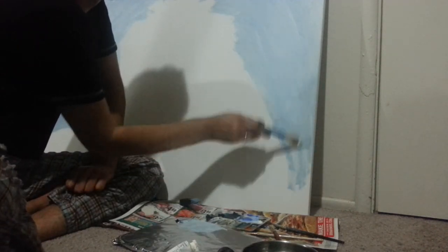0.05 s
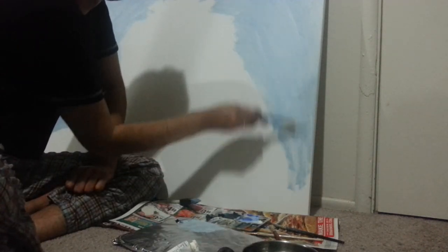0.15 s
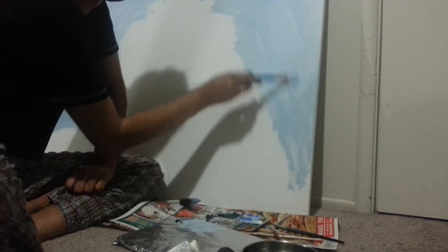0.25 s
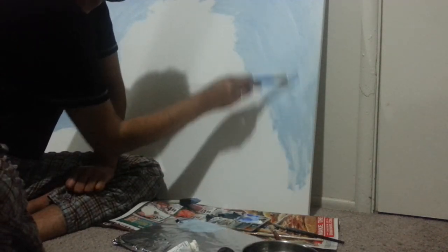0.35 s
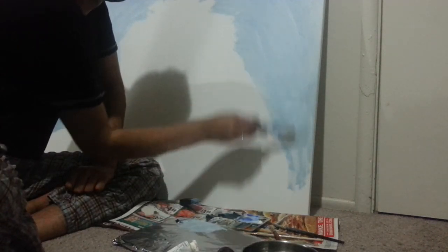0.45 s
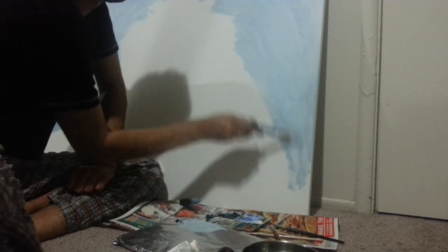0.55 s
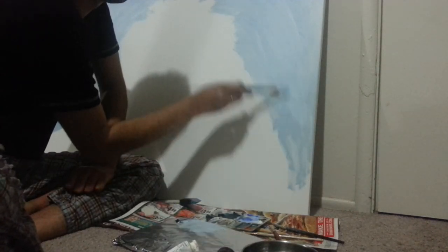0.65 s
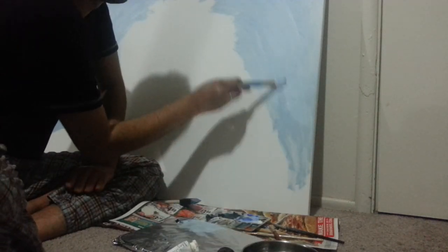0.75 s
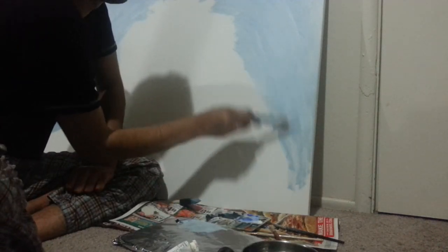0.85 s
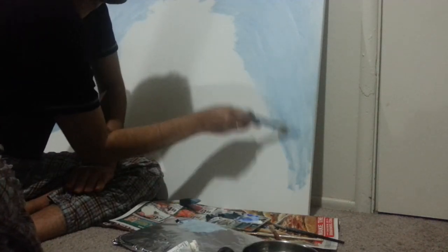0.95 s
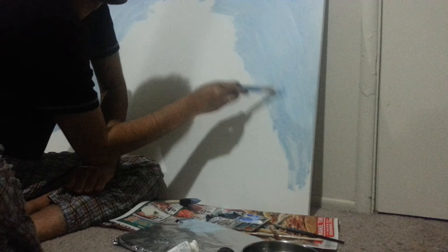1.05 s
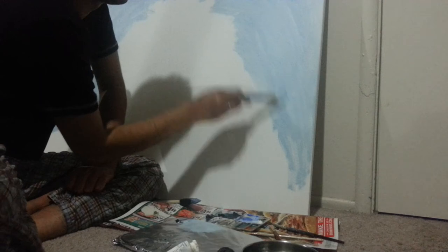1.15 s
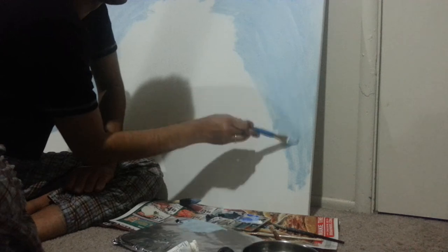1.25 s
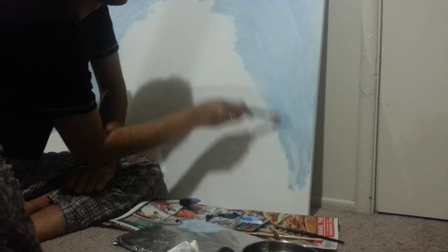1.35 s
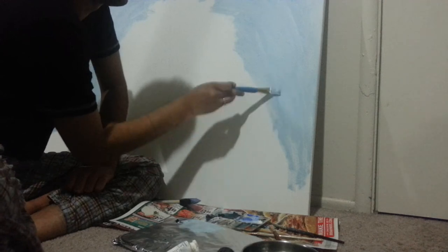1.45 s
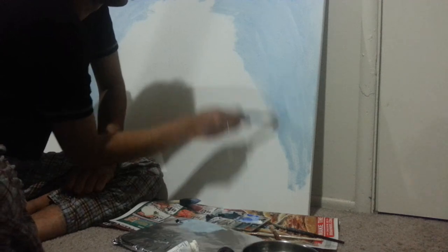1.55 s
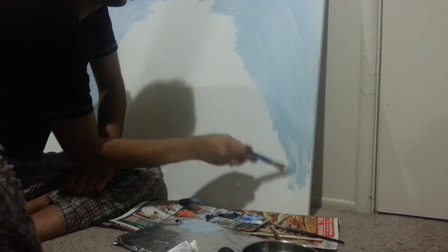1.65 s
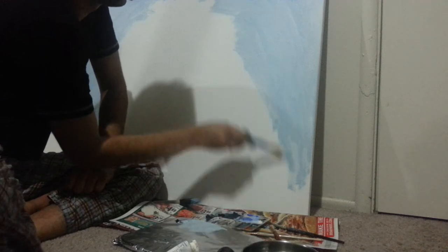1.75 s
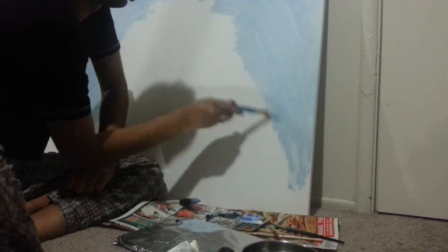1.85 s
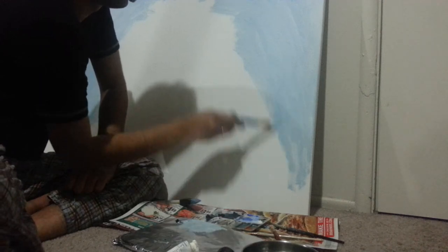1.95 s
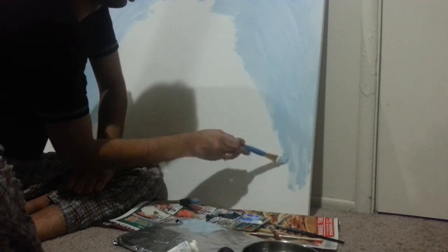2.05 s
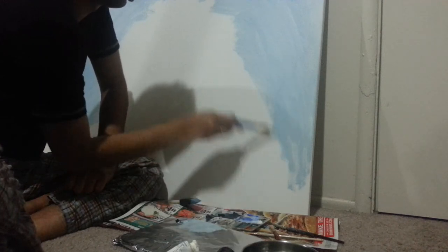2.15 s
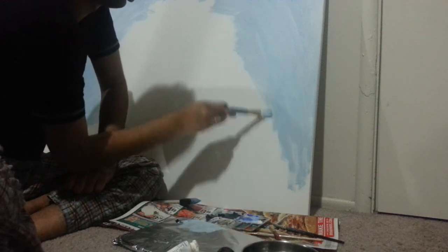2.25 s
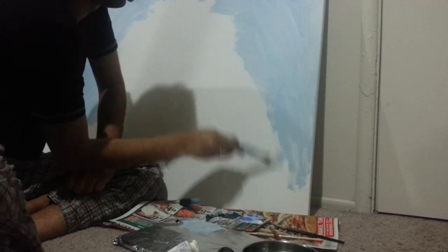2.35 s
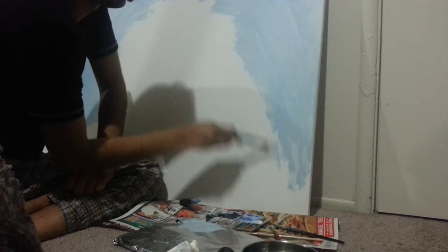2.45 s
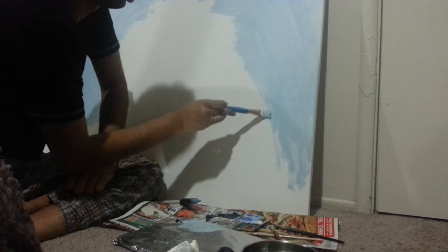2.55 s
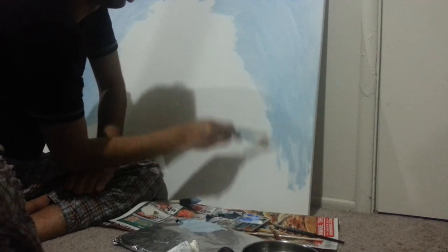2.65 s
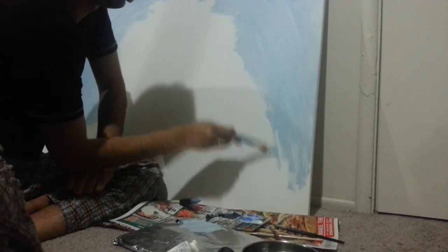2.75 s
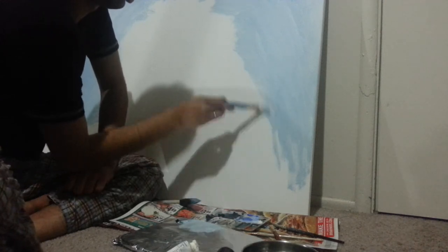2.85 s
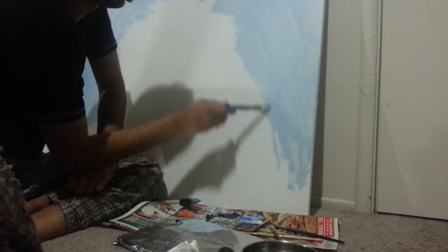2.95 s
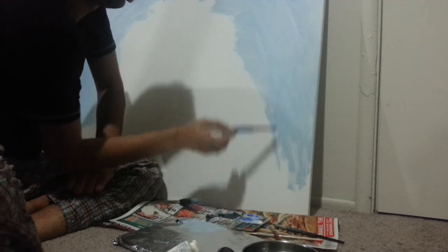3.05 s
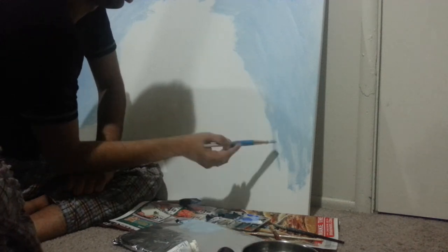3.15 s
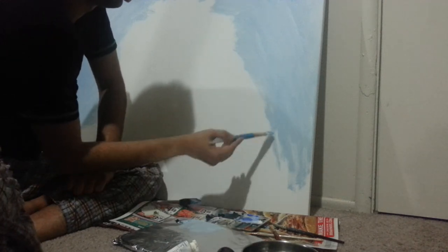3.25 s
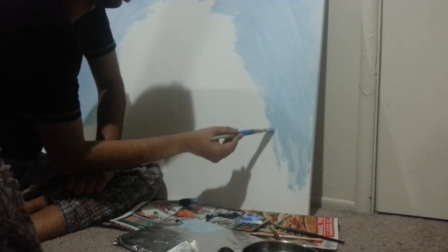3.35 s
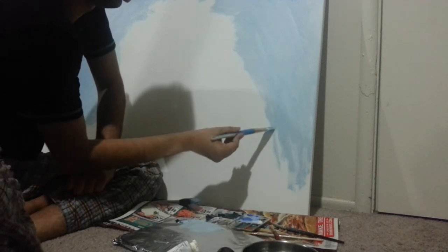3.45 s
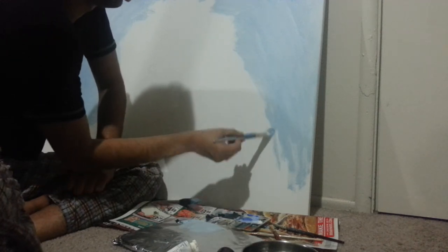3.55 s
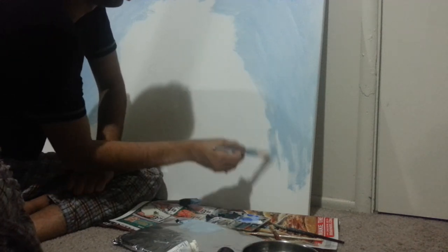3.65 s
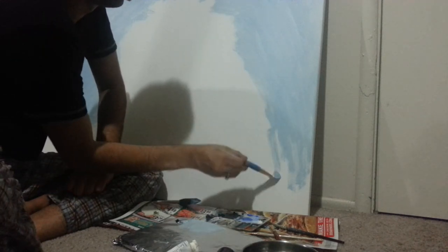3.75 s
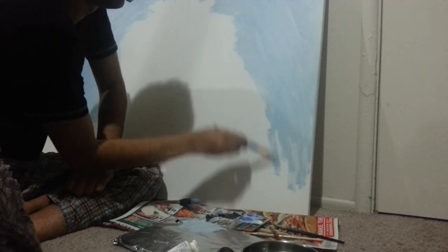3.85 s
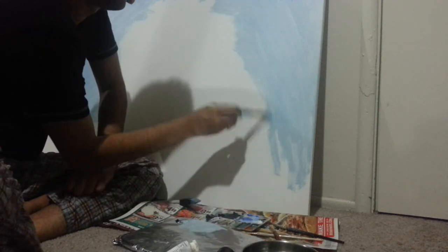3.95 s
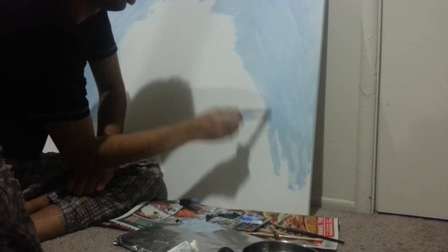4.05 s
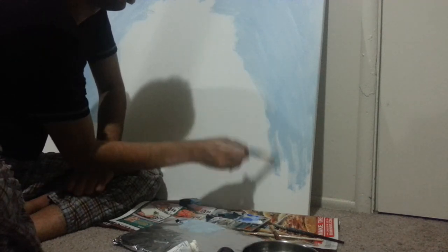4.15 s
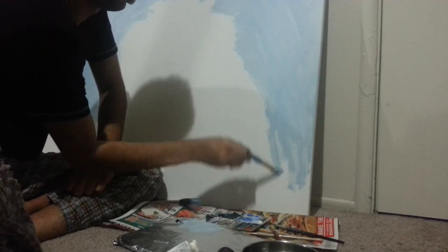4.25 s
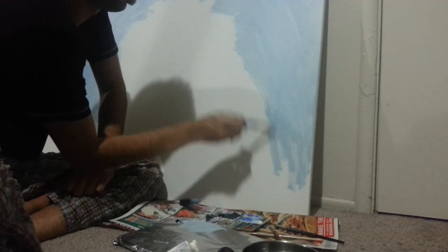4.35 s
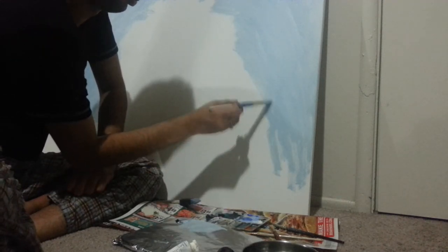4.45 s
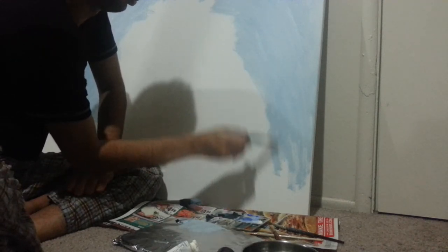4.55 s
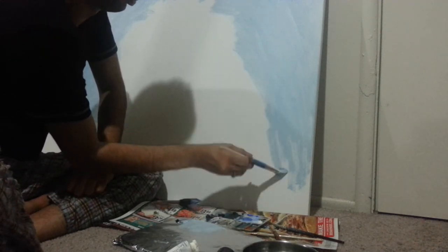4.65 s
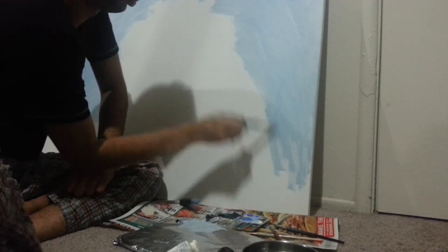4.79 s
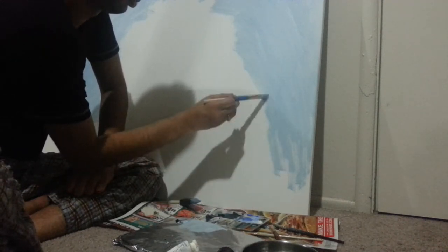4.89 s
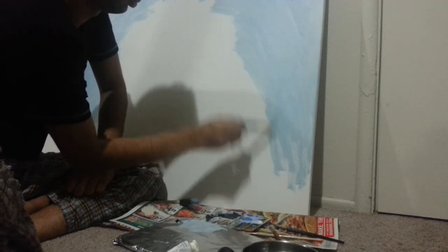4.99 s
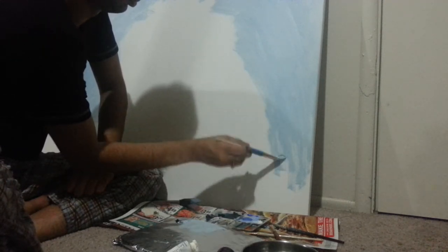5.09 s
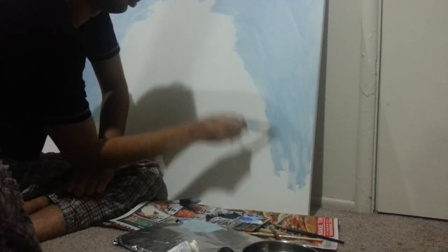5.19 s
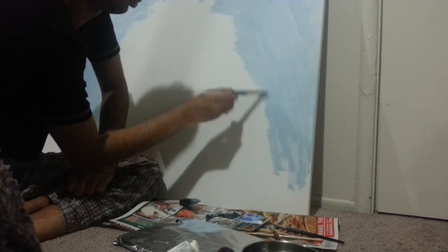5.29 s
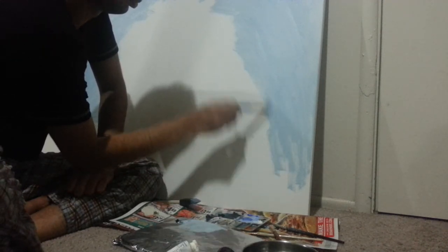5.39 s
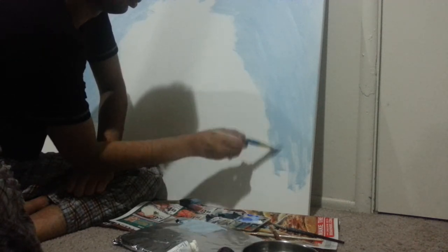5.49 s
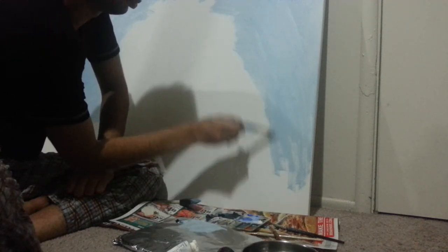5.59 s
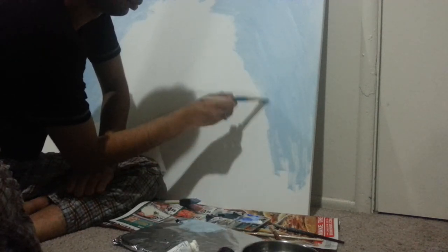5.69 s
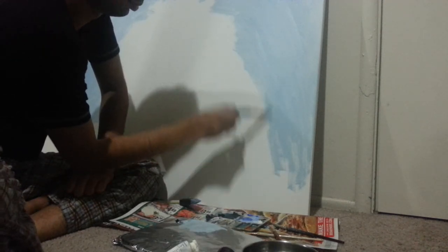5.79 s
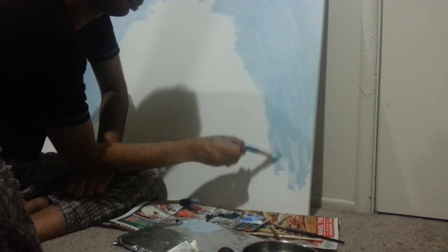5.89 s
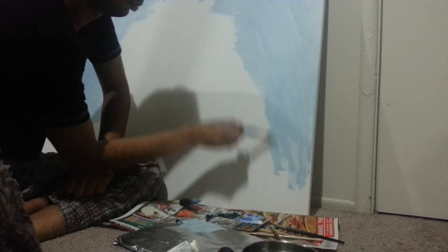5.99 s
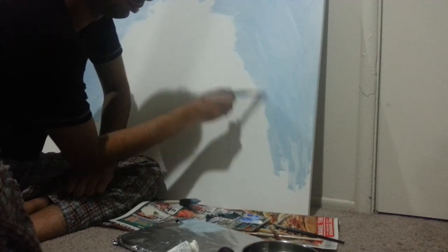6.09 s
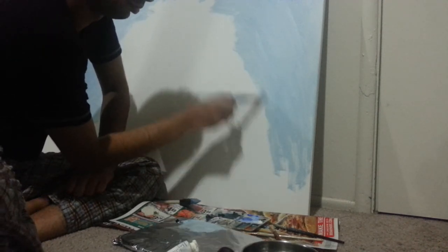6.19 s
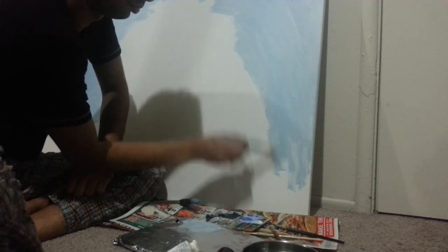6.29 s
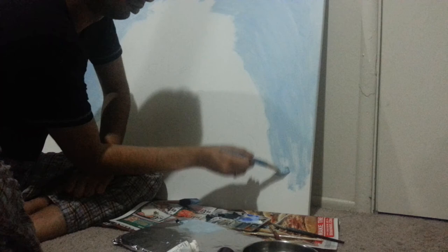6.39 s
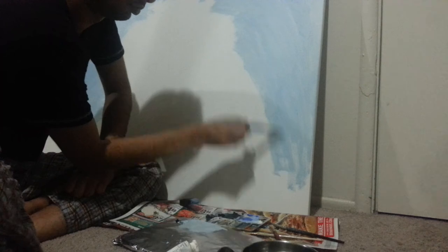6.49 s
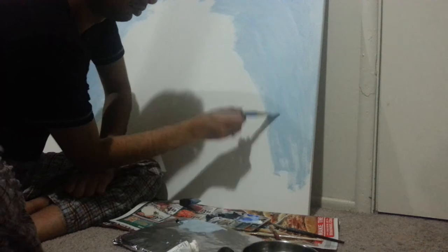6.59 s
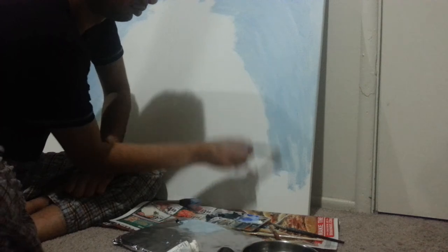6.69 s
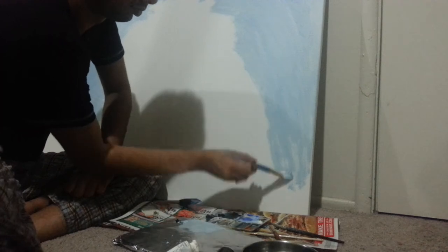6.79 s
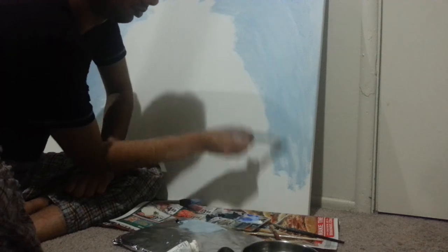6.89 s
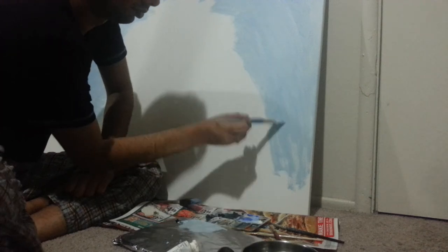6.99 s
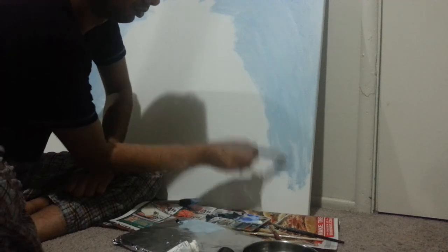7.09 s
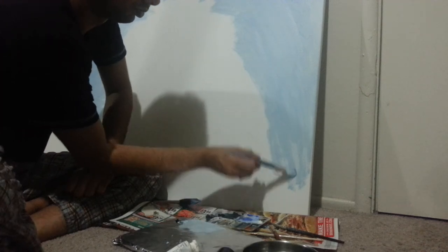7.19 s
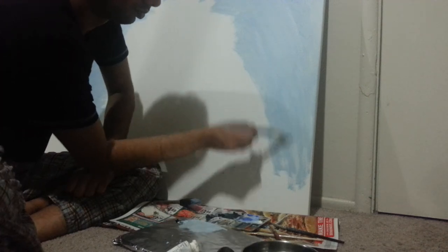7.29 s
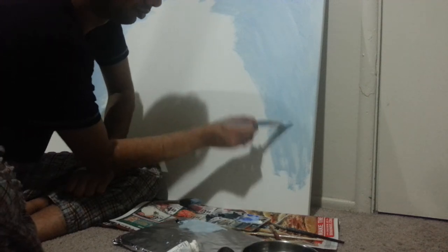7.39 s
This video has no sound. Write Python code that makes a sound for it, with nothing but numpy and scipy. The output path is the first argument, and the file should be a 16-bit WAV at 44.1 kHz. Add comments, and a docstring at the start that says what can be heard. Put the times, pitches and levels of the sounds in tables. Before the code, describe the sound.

A flat paintbrush scrubs back and forth on a stretched canvas from the start, about five strokes a second. Each stroke is a short, bright hiss of bristles with a light rumble of cloth underneath, and some hold faint, brief gliding tones. At about 3 seconds the scrubbing pauses, leaving very light touches and two tiny, high ticks. Around 3.6 seconds the strokes resume, somewhat softer. From about 4.2 to 5.5 seconds the brush bumps and pushes the canvas, giving soft, low, drum-like thuds, strongest near 4.4 seconds. The scrubbing continues unevenly, with a stronger stroke near 6.2 seconds, another thud at 6.5 and two small ticks around 7, and runs on until about 7.5 seconds. Everything is heard from a short way off in a quiet carpeted room, with a very short echo and a faint steady hush.

```python
"""A flat paintbrush scrubs to and fro on a stretched canvas in a quiet carpeted room.
Its bristles slip over the weave in a dense hiss, with a few ticks and brief gliding tones within it.
The cloth rumbles under the brush, thuds when bumped and drums when pushed.
Two microphone ports (openings), each with its own resonance, hear it from a short way off,
along with a short room echo and a steady hush."""
import sys
import numpy as np
from scipy import signal
from scipy.io import wavfile
from scipy.ndimage import uniform_filter1d

SR = 44100
rng = np.random.default_rng(int(sys.argv[2]) if len(sys.argv) > 2 else 0)


def to_wav(sig):
    """Store sig (one row per channel, or 1-D mono) as 16-bit WAV at the path in sys.argv[1].

    Samples outside -1..1 are clipped; the rate is SR.
    """
    pcm = np.clip(np.atleast_2d(sig), -1, 1) * 32767
    pcm = np.round(pcm).astype(np.int16)
    wavfile.write(sys.argv[1], SR, pcm.T)  # frames by channels


N = 327663

# One row per stroke or light touch: start t/s, rise/s, hold/s, hiss level/dB, change over the hold/dB,
# fade/(dB per s), rumble over hiss/dB, rumble change from mid-stroke to end/dB, time pressed/s,
# extra low rasp/dB, extra high fizz/dB, rumble centre f/Hz, drumhead level/dB
STROKES = [(-0.061, 0.056, 0.07, -32, -1.9, 164, -17.5, 2.5, 0.152, 0.5, 0.7, 710, -61),
           (0.127, 0.064, 0.11, -31.8, -10, 190.0, -16, 2, 0.17, -0.5, 1.0, 560.0, -61),
           (0.354, 0.043, 0.093, -37.5, 3.5, 184, -11.5, -1.5, 0.15, 2.5, -0.5, 660, -64),
           (0.562, 0.026, 0.084, -34.5, -0.9, 164, -17.5, -0.5, 0.167, -0.5, 1, 580.0, -65.4),
           (0.757, 0.08, 0.059, -38.5, 2, 192, -11, 3, 0.147, 3, -0.2, 674, -63),
           (0.966, 0.035, 0.072, -33, -2.5, 192, -17.5, 3.5, 0.13, -0.4, -0.4, 680.0, -62),
           (1.136, 0.059, 0.059, -38.5, 0, 220.0, -10, -0.7, 0.137, 2.4, -1.5, 604, -67),
           (1.324, 0.038, 0.087, -36, -7.5, 204, -14.5, -1.5, 0.16, 0.3, -0.4, 680.0, -60),
           (1.511, 0.032, 0.11, -46, 4.5, 198, -8.5, 3.3, 0.13, 3.5, -1.5, 627, -66),
           (1.748, 0.032, 0.11, -36, -5, 210.0, -15.5, -1, 0.12, -1.6, 1.5, 600.0, -63.5),
           (1.932, 0.049, 0.084, -45, 1.5, 250.0, -6.5, 4.5, 0.085, 1.4, -1, 680, -67.3),
           (2.115, 0.044, 0.083, -33.5, -5, 280.0, -14.5, 0.5, 0.12, -2.5, -0.1, 680.0, -61),
           (2.265, 0.087, 0.046, -30.5, -3, 222, -14, -4, 0.23, -1.5, 1.5, 626, -59),
           (2.438, 0.04, 0.053, -33.5, 2.5, 217, -17, -0.5, 0.18, -1, 0.2, 620.0, -65),
           (2.607, 0.048, 0.045, -35.5, 4.5, 207, -10.5, 3.1, 0.061, -1.5, 2.5, 730.0, -61.5),
           (2.754, 0.072, 0.045, -31.5, -7, 184, -13.5, -3, 0.289, -0.9, -0.2, 550.0, -60.5),
           (3.064, 0.0099, 0.016, -61.5, -2, 320.0, -22, 9, 0.1, -0.5, 4.0, 490.0, -76.2),
           (3.149, 0.011, 0.018, -62.5, -2.5, 390.0, -17, 5, 0.009, 1, 7.5, 510.0, -67),
           (3.329, 0.0085, 0.012, -73.8, -8, 102, -11, 4, 0.017, 2, 4.0, 510.0, -78),
           (3.564, 0.018, 0.06, -61, 7.5, 200.0, -6.4, 2, 0.027, -2.5, -1, 430.0, -76.0),
           (3.592, 0.091, 0.09, -40, -11.5, 310.0, -13, -1.5, 0.234, -1.6, -0.2, 600, -70),
           (3.825, 0.045, 0.11, -41.5, 2.1, 257, -9, 5, 0.11, -1.0, 0, 410.0, -62.5),
           (4.076, 0.076, 0.06, -42, -6.5, 240.0, -7, 0.5, 0.194, 1, -0.5, 470.0, -55.5),
           (4.287, 0.057, 0.047, -40.5, 0.3, 220.0, -5.5, 1, 0.18, 0.0, -0.5, 337, -45.5),
           (4.487, 0.087, 0.091, -43.5, -6.4, 240.0, 0.5, 4, 0.11, 3, 0, 350.0, -51.5),
           (4.713, 0.062, 0.062, -41, -4.5, 230.0, -14.5, -1, 0.27, 0.2, -0.3, 460.0, -62.5),
           (4.926, 0.096, 0.061, -39, -4, 250.0, -6.5, 0, 0.13, 1.3, -2, 453, -58),
           (5.139, 0.06, 0.072, -41.1, 1.8, 183, -11.5, 3.5, 0.11, -0.5, -0.5, 297, -63.5),
           (5.358, 0.082, 0.063, -40, 1.1, 250.0, -9.5, 7.5, 0.1, 1.4, -0.0, 450.0, -66),
           (5.574, 0.024, 0.063, -47, 2, 218, -15.5, 2.0, 0.253, 0.8, -0.5, 730.0, -69.5),
           (5.764, 0.053, 0.075, -42, 6.5, 235, -13, 4.6, 0.14, -1, 0.5, 605, -65),
           (5.964, 0.052, 0.074, -43.4, -6.8, 320.0, -11.5, 2, 0.069, 1.5, -2, 670.0, -68),
           (6.177, 0.085, 0.098, -33, -6, 230.0, -11.5, 2.3, 0.19, 0.2, 1.5, 575, -58),
           (6.418, 0.047, 0.09, -44.5, -14.5, 240.0, -4.5, 11, 0.076, 1.3, -1, 320.0, -50),
           (6.62, 0.05, 0.083, -36.4, 1.2, 212, -9.5, 0.1, 0.15, 0.3, 1.5, 646, -58),
           (6.837, 0.035, 0.051, -45, -5.5, 390.0, -17.5, 2.5, 0.287, -1.3, -2, 560.0, -72.1),
           (6.988, 0.01, 0.022, -62, -1.7, 230.0, -20.0, 7.5, 0.031, 2, 4, 440.0, -70),
           (7.024, 0.058, 0.072, -38, -2, 262, -11.5, 6, 0.11, -0.3, 0, 700, -59),
           (7.228, 0.038, 0.064, -44.5, -1, 260.0, -14, 1, 0.154, 1.9, -1.5, 490.0, -71),
           (7.411, 0.016, 0.019, -54, -6.2, 450.0, -14.5, -9, 0.153, 1, -1, 460.0, -72.5)]
# How the ports colour the hiss: f/Hz, left/dB, right/dB, left-right likeness (0 to 1), left lead/rad
PORT_COLOUR = [(120, -46, -50, 0.73, -0.5), (500, -20.5, -39, 0.24, -0.06), (1110, -16.5, -15.5, 0.81, 1.3),
               (1350, -16, -20, 0.17, 2.5), (1600, -13.5, -17.5, 0.91, 1.1), (3000, -11, -13.5, 0.97, 1.06),
               (3230, -8.5, -12.5, 0.16, 2.5), (4040, -9, -14.5, 0.33, 1.2), (5400, -4.5, -8, 0.48, 0.22),
               (6450, -10, -5.5, 0.36, 1.16), (7200, -17.5, 0.5, 0.16, 1.5), (7700, -15, -5, 0.086, 5),
               (9940, -20, -14, 0.103, 0), (10750, -18.5, -13, 0.069, 3.1), (13900, -26, -21.5, .1, 1.5),
               (15100, -47, -33.5, 0.077, 1.5)]
# The bristles catch all at once: t/s, size of the level step/dB
CATCHES = [(.392, 1), (.587, 2), (.995, 2), (1.354, 3), (1.54, 3), (1.773, 5), (2.148, 2), (2.97, 3),
           (3.585, 7), (3.625, 5), (3.845, 4), (4.118, 16), (4.321, 2), (4.755, 4), (4.984, 2), (5.595, -1),
           (5.802, 4), (6.211, 7), (6.635, 6), (6.9965, 5), (7.048, 7), (7.259, 3)]
# Brief gliding tones heard within the scrubbing: t/s, length/s, first f/Hz, last f/Hz, level/dB
GLIDES = [(0.051, 0.054, 837, 390, -50), (0.185, 0.066, 490, 570, -51), (0.257, 0.027, 370, 295, -49),
          (0.376, 0.034, 305, 362, -47.5), (.41, 0.06, 525, 557, -45), (0.497, 0.048, 560, 378, -49),
          (0.829, 0.017, 806, 876, -44.5), (0.852, 0.043, 286, 325, -48), (0.885, 0.03, 898, 640, -44.5),
          (1.225, 0.072, 281, 423, -52), (1.35, 0.081, 787, 850, -52.5), (1.991, 0.093, 820, 754, -50.5),
          (2.306, 0.043, 723, 867, -46), (2.362, 0.072, 1122, 264, -45), (2.458, 0.043, 415, 424, -47.5),
          (2.546, 0.025, 900, 624, -46.5), (2.651, 0.038, 703, 888, -41), (5.2, 0.064, 301, 284, -42.5),
          (5.386, 0.042, 475, 865, -58), (5.85, 0.1, 434, 404, -53), (5.851, 0.057, 950, 840, -48.5),
          (6.235, 0.043, 1064, 1215, -49.5), (6.74, 0.025, 870, 650, -42), (7.08, 0.062, 895, 778, -49.5),
          (7.282, .07, 456, 292, -57)]
# Sharp ticks: t/s, level/dB, left over right/dB
TICKS = [(3.076, -38, -16), (3.1585, -40, -19), (6.9162, -42, -9), (6.998, -38, -15)]
# The tones in one tick: f/Hz, level/dB, time to fade by 60 dB/s
TICK_TONES = [(7530, -6.5, 0.0044), (8650, -2, 0.0022), (11100, -8, 0.0037), (13000, -20, .002)]
# Resonances (favourite pitches) of the cloth on its frame: f/Hz, width/Hz, level/dB
CLOTH_RESONANCES = [(222, 35, 1), (297.5, 46.4, 1.5), (344.5, 27.4, 1.5), (417, 49, -2), (520, 64, -1.5),
                    (610, 95, -2.5), (712, 64, 0), (844, 104, 0), (946, 130, -2.5), (1008, 67, -4.5)]
# Looser swings of the whole cloth: f/Hz, width/Hz, level/dB
DRUM_RESONANCES = [(102, 57, -8), (181, 44, -9.5), (61, 47, -32.5)]
# Firm pushes on the cloth: t/s of the widest swing, level/dB, swell time/s
PUSHES = [(3.9, -55.5, 0.059), (4.235, -53, 0.074), (4.42, -40.5, 0.062), (4.615, -41.5, 0.065),
          (4.81, -64.5, 0.034), (5.0, -63, .03), (5.475, -60.5, 0.023), (6.52, -46, .065)]
# The brush bumps the cloth: t/s, strength/dB, f/Hz
BUMPS = [(3.875, -49, 260), (4.191, -42, 300), (4.355, -29, 345), (4.559, -35, 333), (4.982, -39, 344),
         (5.454, -38, 295), (6.464, -34, 320)]
# Colour of the background hush: f/Hz, left/dB, right/dB, left-right likeness (0 to 1)
HUSH_COLOUR = [(30, 10, 13, .5), (66, -10, -20, .5), (130, 7, 6.5, 0.22), (260, 0, -7, 0.19),
               (500, -3.5, -9, 0.21), (1200, -10, -17.5, .05), (3520, -14, -16, 0.031),
               (5500, -13, -16, .05), (7700, -16, -9, .05), (9500, -11, -14.5, .02),
               (10700, -18, -0.5, .02), (12500, -19, -19, .02), (14700, -8, -14, .02)]

RISE_POWER = 2.03  # a stroke swells as this power of the time since the brush set off
RASP_DIP, RASP_DIP_MOST_DB = 0.24, 1.5  # the low rasp thins as the brush slows, down to a limit
LEAD_DB, LEAD_S = 19.5, 0.023  # the cloth rumbles before the hiss has built up
STOP_DB_PER_S = 143  # the rumble falls away under the hiss once the pressure is off
DRUM_SHARE, DRUM_LAG_S = 0.86, 0.014  # the drumhead follows the stroke, shallower and late
DRUM_HZ, SETTLE_S = 135.6, 0.032  # its clear note settles fast after a push
LINGER_DB, LINGER_FADE_S = -26, 0.79  # a faint ring stays on, losing 60 dB in this time
HUSH_DB, TREBLE_LIMIT_HZ = -69.5, 14620


def bristle_hiss():
    """Bristles slip over the weave, coloured by the ports; tufts catch and free in drifting patches."""
    slicing = dict(fs=SR, nperseg=256, noverlap=192)
    hz, t, spectrum = signal.stft(slips(per_s=10000, spread_db=2.0), **slicing)
    left_db, right_db, likeness, lead = at_pitches(PORT_COLOUR, hz)
    patches = uniform_filter1d(rng.standard_normal((len(t), len(hz))).T, size=4, axis=0)
    patches = unit_level(uniform_filter1d(patches, size=20, axis=1))
    judder = wobble(len(t), smooth=9)  # the whole brush stutters
    colour_db = np.array([left_db, right_db]) + 1.58 * patches + 0.083 * judder
    spectrum = stereo(spectrum, likeness) * gain_of(colour_db)
    spectrum[0] *= np.exp(1j * lead)
    spectrum /= np.sqrt(np.mean(signal.istft(spectrum, **slicing)[1].mean(0) ** 2))
    hiss_db, _, _, rasp_db, fizz_db, _ = stroke_curves(t)
    light_touch_db = -0.23 * (np.maximum(hiss_db, -80) + 39.0)  # a light touch is brighter at the top
    highs = np.clip((hz[:, None] - 8000) / 2500, 0, 1)
    lows = np.clip((4300 - hz[:, None]) / 900, 0, 1)
    spectrum *= gain_of(highs * (fizz_db + light_touch_db) + lows * rasp_db)
    hiss = signal.istft(spectrum, **slicing)[1][:, :N]
    sample_t = np.arange(N) / SR
    return hiss * gain_of(stroke_curves(sample_t)[0] + catch_db(sample_t))


def slips(per_s, spread_db):
    """Rubbing is many tiny slips: two dense streams of clicks of random size and sign."""
    size = gain_of(spread_db * np.minimum(rng.exponential(1, (2, N)), 4))
    sign = rng.choice([-1., 1.], (2, N))
    return unit_level(size * sign * (rng.random((2, N)) < per_s / SR))


def stroke_curves(t):
    """Strokes rise, hold and fade: gives hiss, rumble, drumhead, rasp, fizz (dB), rumble centre (Hz)."""
    (start, rise, hold, hiss_db, change_db, fade, rumble_db, along_db, pressed,
     rasp_db, fizz_db, centre_hz, drum_db) = np.transpose(STROKES)[:, :, None]
    step = 1 / 1000
    grid = np.arange(0, N / SR + step, step)
    since = grid - start
    rise_db = 20 * RISE_POWER * np.log10(np.clip(since / rise, 1e-4, 1))
    slowed_db = fade * np.maximum(since - rise - hold, 0)
    shape_db = rise_db + change_db * np.clip((since - rise) / hold, 0, 1) - slowed_db
    lead_db = LEAD_DB * np.exp(-abs(since) / LEAD_S)
    travel_db = along_db * (2 * np.clip(since / (rise + hold), 0, 1) - 1)
    stop_db = STOP_DB_PER_S * np.maximum(since - pressed, 0)
    # Squared gains are powers, which add up where strokes overlap.
    hiss = gain_of(hiss_db + shape_db) ** 2
    rumble = hiss * gain_of(rumble_db + lead_db + travel_db - stop_db) ** 2
    drum = gain_of(drum_db + DRUM_SHARE * shape_db) ** 2 * (since > 0)
    lag = np.exp(-step / DRUM_LAG_S)
    late_drum = signal.lfilter([1 - lag], [1, -lag], drum.sum(0))
    levels = [10 * np.log10(power + 1e-12) for power in (hiss.sum(0), rumble.sum(0), late_drum)]
    rasp_db = rasp_db - np.minimum(RASP_DIP * slowed_db, RASP_DIP_MOST_DB)
    share = hiss / (hiss.sum(0) + 1e-30)  # the loudest stroke has most say in the colour
    colours = [(share * column).sum(0) for column in (rasp_db, fizz_db, centre_hz)]
    return [np.interp(t, grid, curve) for curve in levels + colours]


def catch_db(t):
    """At each catch the bristles bend and hold back, then let go with a little overshoot."""
    when, step_db = np.transpose(CATCHES)[:, :, None]
    hold_back = -0.7 * np.exp(-abs(t - when) / 0.015)
    let_go = 0.23 * np.exp(-abs(t - when) / 0.0035)
    return (step_db * np.where(t < when, hold_back, let_go)).sum(0)


def gliding_tones():
    """Brief gliding tones heard within the scrubbing; each swells and fades, its pitch a little rough."""
    out = np.zeros(N)
    uneven = wobble(N, smooth=300)
    for start, length, from_hz, to_hz, db in GLIDES:
        at, n = round(start * SR), round(length * SR)
        hz = np.linspace(from_hz, to_hz, n) * (1 + 0.02 * uneven[at:at + n])
        swell = gain_of(db) * signal.windows.tukey(n, 0.7)
        out[at:at + n] += swell * np.sin(2 * np.pi * np.cumsum(hz) / SR)
    return out


def bristle_ticks():
    """A bristle or wet paint lets go with a click that rings high for a moment."""
    out, t = np.zeros((2, N)), np.arange(200) / SR
    click = sum(gain_of(db - 60 * t / fade) * np.sin(2 * np.pi * hz * t) for hz, db, fade in TICK_TONES)
    click = cut_below(click, hz=5800, order=3)
    for start, db, pan_db in TICKS:
        sides_db = np.array([[pan_db], [-pan_db]]) / 2
        out[:, round(start * SR):][:, :len(t)] += gain_of(db + sides_db) * click
    return out


def cloth_rumble():
    """Rubbing shakes the cloth's low resonances, different ones as the brush travels."""
    _, rumble_db, _, _, _, centre_hz = stroke_curves(np.arange(N) / SR)
    rub = stereo(slips(per_s=5000, spread_db=2.5), likeness=0.84)
    rumble = ring(rub * gain_of(rumble_db), CLOTH_RESONANCES, np.maximum(centre_hz, 100))
    return cut_below(rumble / np.std(ring(rub, CLOTH_RESONANCES)), hz=120)


def cloth_drum():
    """The whole cloth swings like a drumhead: loosely with each stroke, on a clear note when pushed."""
    t = np.arange(N) / SR
    drum_db = stroke_curves(t)[2]
    note = np.sin(2 * np.pi * np.cumsum(DRUM_HZ + 3 * wobble(N, smooth=1500)) / SR)
    note *= gain_of(3.5 * wobble(N, smooth=900))  # the brush on the cloth unsettles it
    shaking = stereo(rng.standard_normal((2, N)), likeness=0.73)
    loose = unit_level(ring(shaking, DRUM_RESONANCES))
    drum = np.sqrt(2) * note * push_swing(t) + loose * gain_of(drum_db)
    return drum * gain_of([[-0.7], [0.7]])  # a little louder on the right


def push_swing(t):
    """How strong the clear note is: each push swells, settles and leaves a faint ring."""
    when, level_db, swell = np.transpose(PUSHES)[:, :, None]
    since = t - when
    before = np.cos(np.pi / 2 * np.clip(since / swell, -1, 0)) * (1 + gain_of(LINGER_DB))
    settle = np.exp(-(since / SETTLE_S) ** 2 / 2)
    linger = gain_of(LINGER_DB - 60 * abs(since) / LINGER_FADE_S)
    return (gain_of(level_db) * np.where(since < 0, before, settle + linger)).sum(0)


def cloth_bumps():
    """A soft blow of a few cycles sets the cloth's resonances near its pitch ringing."""
    blows, t = np.zeros(N), np.arange(1500) / SR
    swell = t / 0.0031 * np.exp(1 - t / 0.0033)
    for start, db, hz in BUMPS:
        blows[round(start * SR):][:len(t)] += gain_of(db) * swell * np.sin(2 * np.pi * hz * t)
    return ring(blows, CLOTH_RESONANCES)


def ring(x, resonances, centre_hz=None):
    """Shakes resonances of alternating sign with x; those near centre_hz are shaken hardest."""
    out = 0
    for k, (hz, width, db) in enumerate(resonances):
        decay = np.exp(-np.pi * width / SR)
        drop_db = 0 if centre_hz is None else np.minimum(3.66 * np.log2(hz / centre_hz) ** 2, 9)
        feedback = decay * np.exp(2j * np.pi * hz / SR)
        ringing = signal.lfilter([1 - decay], [1, -feedback], x * gain_of(-drop_db)).real
        out = out + (-1) ** k * gain_of(db) * 2 * ringing
    return out


def room_echo(x):
    """Scattered reflections die fast in the carpeted room; each port gets its own."""
    t = np.arange(9000) / SR
    echoes = rng.choice([-1., 1.], (2, len(t))) * (rng.random((2, len(t))) < 0.06)
    echoes *= (t > 0.004) * gain_of(-60 * t / 0.13)
    lows = signal.butter(2, 900, fs=SR, output="sos")
    echoes[1] += signal.sosfilt(lows, 0.45 * (echoes[0] - echoes[1]))  # long waves arrive more alike
    echoes /= np.linalg.norm(echoes, axis=1, keepdims=True)
    return signal.fftconvolve(x, echoes, axes=1)[:, :N]


def hush():
    """The steady, faint noise of the room and the microphones."""
    hz, _, spectrum = signal.stft(rng.standard_normal((2, N)), SR, nperseg=2048)
    left_db, right_db, likeness = at_pitches(HUSH_COLOUR, hz)
    spectrum = stereo(spectrum, likeness) * gain_of([left_db, right_db])
    noise = signal.istft(spectrum, SR, nperseg=2048)[1][:, :N]
    return gain_of(HUSH_DB) * noise / np.std(noise.mean(0))


def gain_of(db):
    """Turns decibels into a number to multiply by."""
    return 10 ** (np.asarray(db) / 20)


def unit_level(x):
    """Scales x to an average (rms) level of 1."""
    return x / np.sqrt(np.mean(x ** 2) + 1e-20)


def wobble(n, smooth):
    """A random wander of n points; a larger smooth makes it slower."""
    return unit_level(uniform_filter1d(rng.standard_normal(n), size=smooth))


def at_pitches(table, hz):
    """Looks up a table at the frequencies hz, blending between its rows."""
    row_hz, *columns = np.transpose(table)
    return [np.interp(np.log(hz + 1), np.log(row_hz + 1), column)[:, None] for column in columns]


def stereo(x, likeness):
    """Mixes two unrelated signals into a left and right of given likeness."""
    likeness = np.clip(likeness, 0, 1)
    return np.array([x[0], likeness * x[0] + np.sqrt(1 - likeness ** 2) * x[1]])


def cut_below(x, hz, order=2):
    """Turns down everything lower than hz."""
    return signal.sosfilt(signal.butter(order, hz, "high", fs=SR, output="sos"), x)


def scene():
    """Brush and cloth with their room echo, over the hush."""
    hits = cloth_bumps() + bristle_ticks()
    rubbing = bristle_hiss() + cloth_rumble() + cloth_drum() + gliding_tones()
    return hits + rubbing + gain_of(-10) * room_echo(hits) + gain_of(-9) * room_echo(rubbing) + hush()


def record(dry):
    """The microphones lose the deepest bass; then the highest treble is cut off."""
    treble_cut = signal.firwin(1023, TREBLE_LIMIT_HZ, window=("kaiser", 9), fs=SR)
    return signal.oaconvolve(cut_below(dry, hz=45), treble_cut[None], "same")


dry = scene()
out = record(dry)
to_wav(out)
```